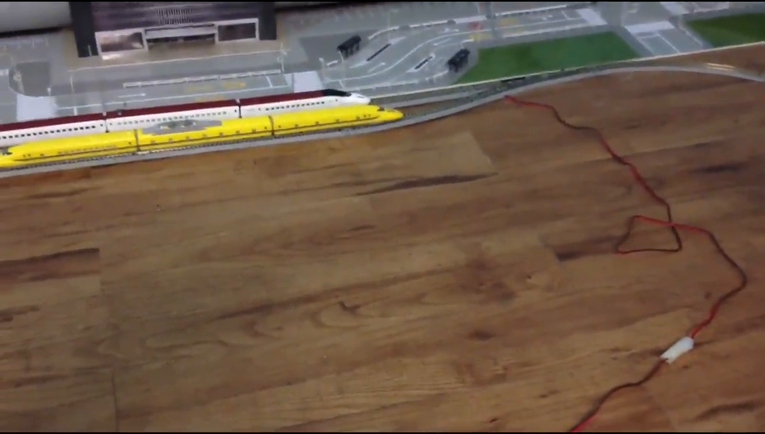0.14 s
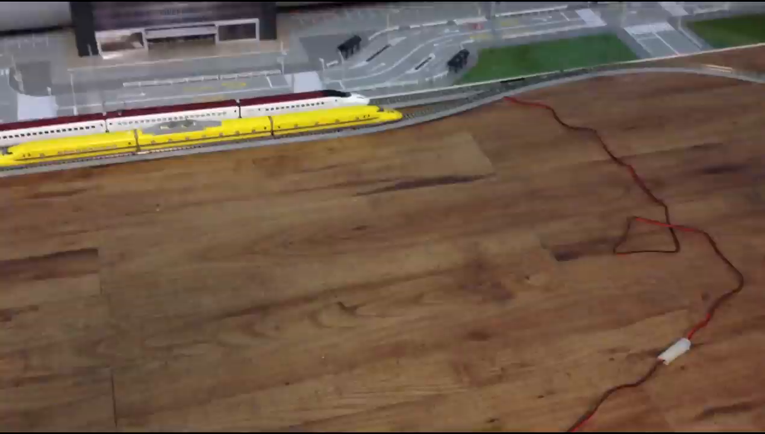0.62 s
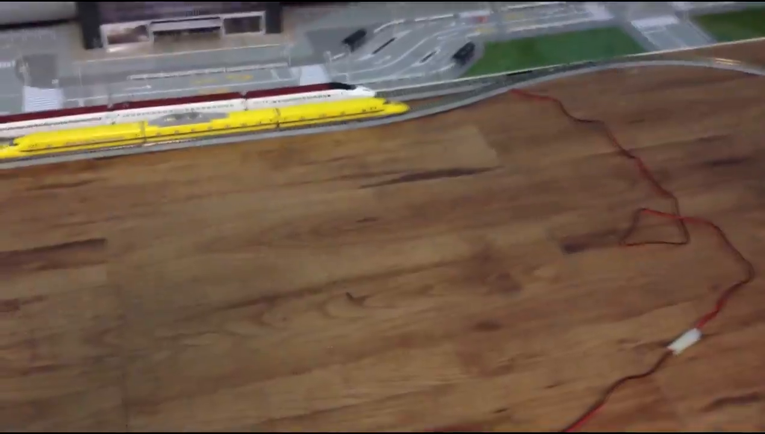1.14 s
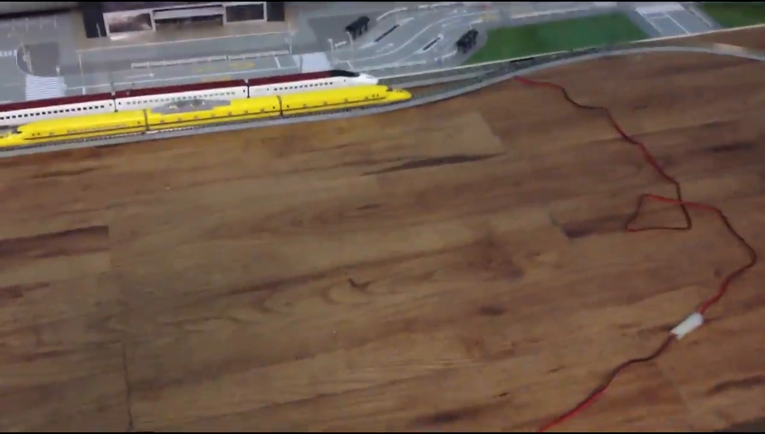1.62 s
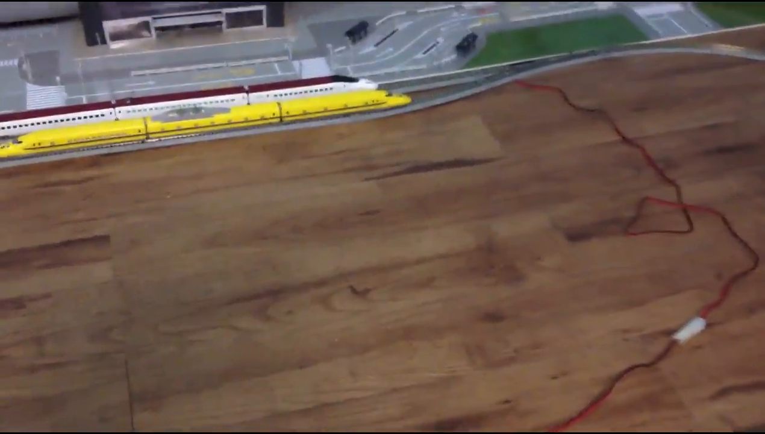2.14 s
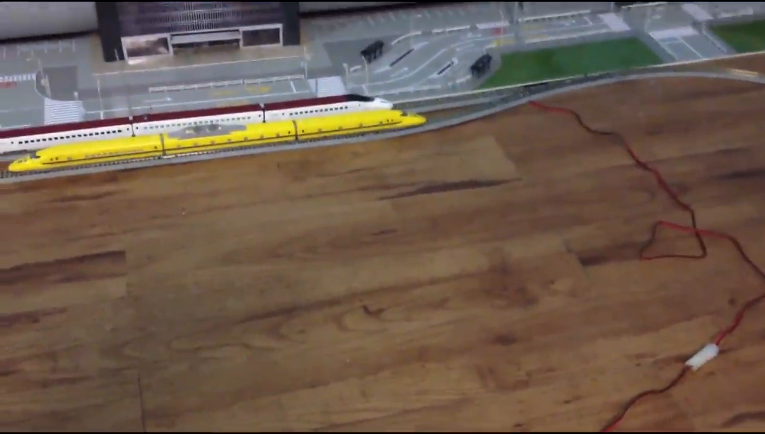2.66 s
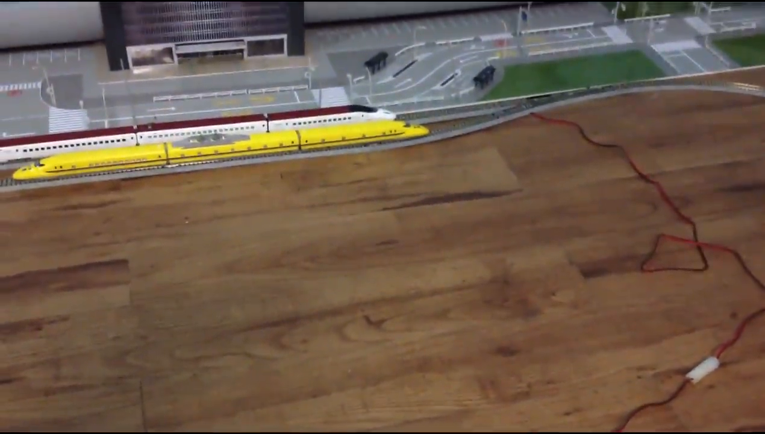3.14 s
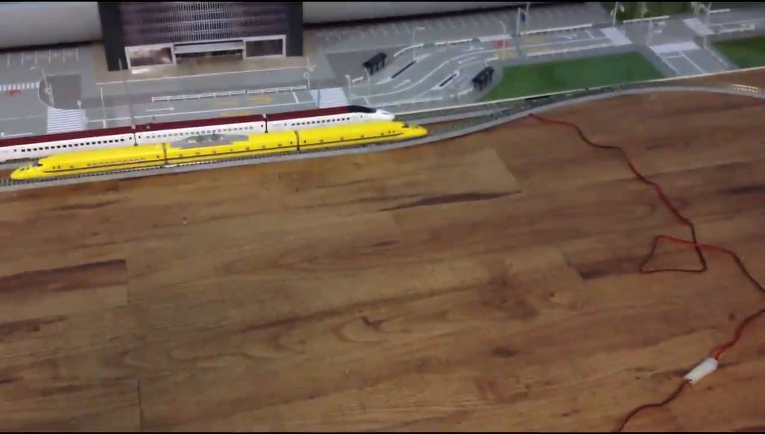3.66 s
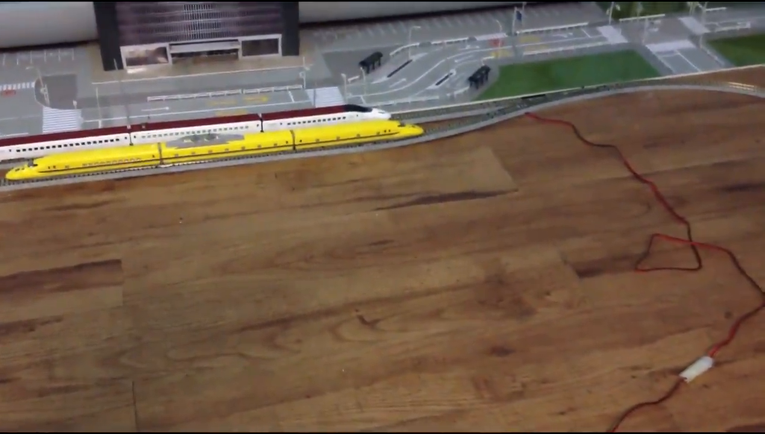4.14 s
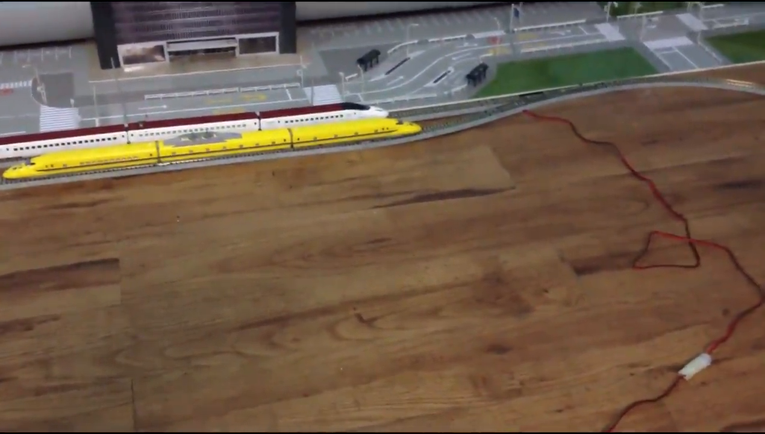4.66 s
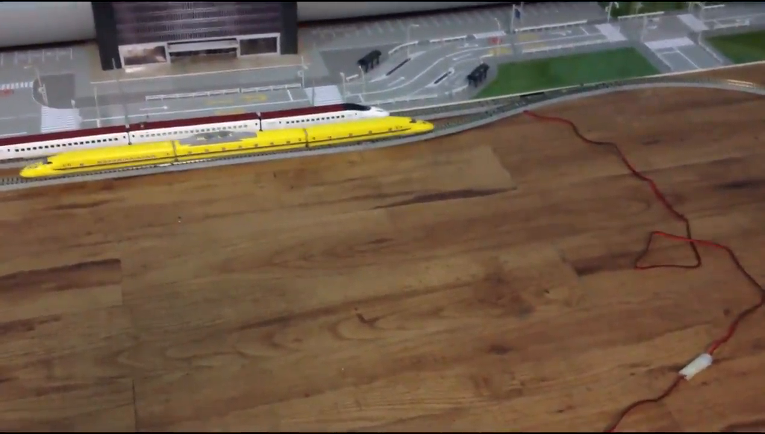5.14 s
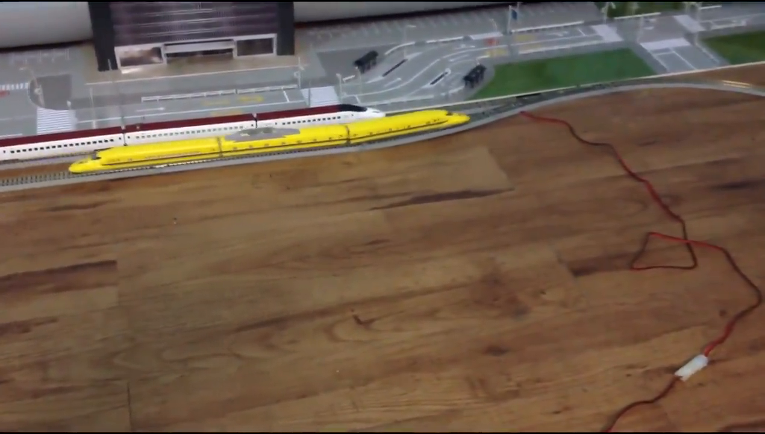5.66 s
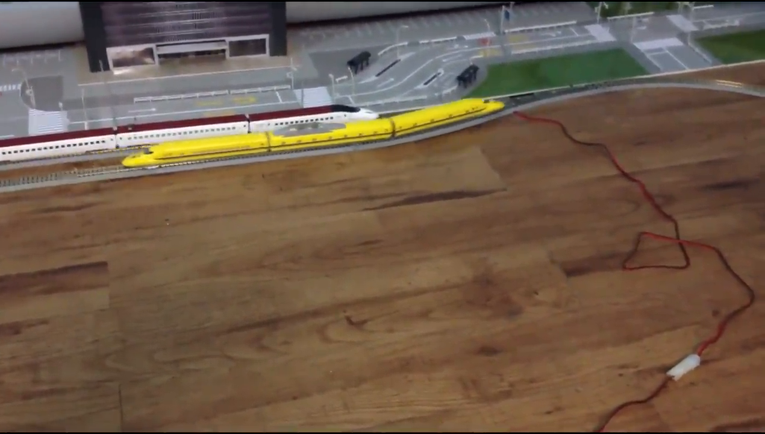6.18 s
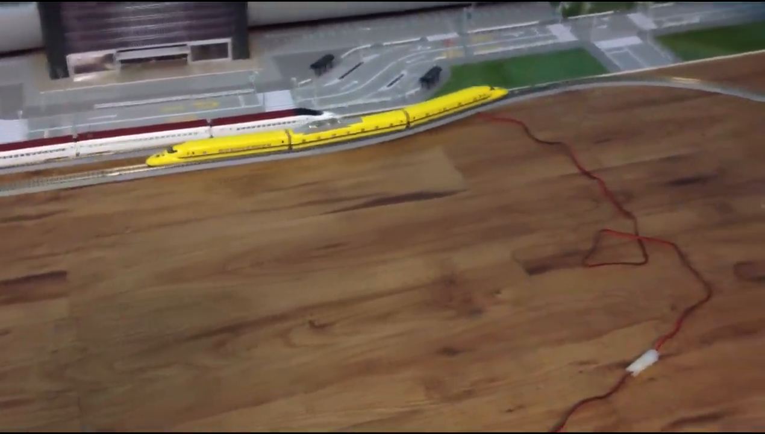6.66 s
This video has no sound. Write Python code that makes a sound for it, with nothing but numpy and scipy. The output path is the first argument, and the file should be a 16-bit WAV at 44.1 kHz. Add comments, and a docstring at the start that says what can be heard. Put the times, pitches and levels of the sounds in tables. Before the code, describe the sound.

High buzzy whir of toy train motors and wheels, one crisp loud clack near two seconds, later clicks, a tiny falling chirp and low rolling rumble.

```python
"""Model trains on a wooden floor

One small electric train runs round the loop: noise at its wheels is shaped by shell, gear, wheel and rail
resonances whose balance shifts as it turns. Wheels tick over rail joints and cars thump over loose track, as
decaying modes. A near train pulls away with a growing roll and hiss, and a flange squeaks as a falling tone.
Motors and supply hum as wavering sines; filtered noise makes the floor rumble. One microphone takes it all.
"""
import sys
import numpy as np
from scipy import signal
from scipy.fft import rfft, irfft, next_fast_len
from scipy.io import wavfile
from scipy.ndimage import uniform_filter1d, map_coordinates

SR = 44100
rng = np.random.default_rng(int(sys.argv[2]) if len(sys.argv) > 2 else 0)


def wav_out(sig):
    """Save sig, one row per channel (or a flat mono array), as 16-bit PCM at SR to the path in sys.argv[1]."""
    wavfile.write(sys.argv[1], SR, np.round(np.clip(np.atleast_2d(sig).T, -1, 1) * 32767).astype(np.int16))


def decibels_to_gain(level_db):
    """Convert a level in decibels to a linear amplitude gain (20 dB per decade)."""
    exponent = np.asarray(level_db, float) / 20
    return 10 ** exponent


N = 299439

# Running train's nearness to the microphone: time_s, shell_level_db
NEARNESS = [(0, -31.5), (1, -28.5), (2.5, -27), (3.5, -27.8), (4.5, -28.5), (5, -30.5), (5.5, -30.5),
            (6, -32.5), (6.79, -36.5)]
# Resonances of car shell, gear train and rail contact: centre_hz, width_hz (before body() widens it),
# level_db (relative within each part)
SHELL = [(970, 370, -18.5), (1400, 490, -6), (1860, 660, -4), (2214, 570, -1), (2770, 1530, -4),
         (5100, 530, -8)]
GEARS = [(3750, 600, -1), (4103, 490, 0.5), (4560, 1040, -3.5)]
RAIL = [(11720, 4600, 11), (14600, 3000, -5)]
# Gears, wheels, rail contact, one row each: level_db (over shell), swing_db, faces_microphone_s
FACING = [(-2, 2, 1.36), (-0.1, 1, 4.43), (-5.5, 2, 5.56)]
# Wheels at rail joints: time_s, peak_db, brightness_db_per_octave
TICKS = [(2.219, -10, 9), (5.385, -14, -2), (5.399, -26, -1), (5.91, -32, 0), (5.949, -15, 0),
         (5.96, -19, 1)]
# Modes of the wheel set: pitch_hz, level_db (relative), t60_s
WHEEL_MODES = [(1370, -6, .03), (2110, -2, 0.031), (2800, -1, 0.023), (3840, 4, .03), (7460, -8, .015)]
# Cars over loose track: time_s, peak_db, brightness_db_per_octave
THUMPS = [(.909, -28, -10), (1.252, -30, 9), (1.279, -31, -7), (1.992, -34, -8), (2.609, -34, -10),
          (2.799, -34, 13), (3.995, -33.5, 4), (6.094, -36, 12), (6.529, -34, 11), (6.58, -30, 5),
          (6.639, -29.5, -3), (6.7, -36, -1)]
# Modes of a floor plank: pitch_hz, level_db (relative), t60_s
PLANK_MODES = [(181, -7.5, 0.11), (207, -9, 0.13), (219, -4, .1), (305, -3, 0.078), (338, -5, 0.088)]
# Spectrum of the track bed under the near train: frequency_hz, density_db (relative, per Hz)
TRACK_BED = [(110, -38), (180, -30), (216, 4.5), (253, -1), (345, -2.5), (383, -3.5), (424, -2.5),
             (493, -6), (716, -1), (840, -1), (1020, -3.5), (1080, -15), (1200, -2), (1560, -22),
             (2640, -120)]
# Spectrum of the near train's wheels: frequency_hz, density_db (relative, per Hz)
NEAR_HISS = [(900, -44), (1300, -6), (3200, 2.5), (4300, -6), (6000, -7), (9800, -2), (15000, -17)]
# Motor hums: start_s, length_s, pitch_hz, level_db
HUMS = [(0, .95, 370.6, -54), (1.2, 1.46, 419.7, -55), (3.35, 0.69, 354.7, -54), (4.9, 1.95, 422.4, -52.5),
        (4.9, 1.95, 349, -51)]
# Spectrum of the floor boards: frequency_hz, density_db (relative, per Hz)
BOARDS = [(25, -24), (60, -49), (95, -40), (115, -2), (140, -3), (171, 2.5), (212, 1), (255, -4), (350, -2),
          (390, -6), (420, -7.5), (460, -11), (560, -22), (700, -36), (910, -52), (1540, -120)]
# Cancellation by the echo off the floor: centre_hz, width_hz, gain_db
FLOOR_ECHO_DIPS = [(543, 78, -2.5), (3080, 300, -1), (5920, 670, -2), (9830, 1100, -2.5)]


def unit(x):
    """Scaled to rms 1."""
    return x / np.sqrt(np.mean(np.abs(x) ** 2) + 1e-20)


def along(points, hz):
    """(frequency_hz, value) points read on a log frequency axis."""
    f, v = np.transpose(points)
    return np.interp(np.log(hz + 1), np.log(f + 1), v)


def shell_level_db(t):
    """The running train's nearness read at times t."""
    times, level = np.transpose(NEARNESS)
    return np.interp(t, times, level)


def wobble(rate):
    """A smooth random curve with this many knots a second."""
    knots = rng.standard_normal(int(N * rate / SR) + 4)
    return map_coordinates(knots, [np.arange(N) * rate / SR])


def coloured(spectrum):
    """Noise of rms 1 with a (frequency_hz, density_db) spectrum."""
    m = next_fast_len(N)
    gain = decibels_to_gain(along(spectrum, np.fft.rfftfreq(m, 1 / SR)))
    return unit(irfft(rfft(rng.standard_normal(m)) * gain, m)[:N])


def tone(hz, level, waver_hz, waver_db, rate):
    """A sine whose pitch and level waver at random."""
    pitch = hz + waver_hz * wobble(12) + waver_hz * wobble(2.5)
    phase = 2 * np.pi * np.cumsum(pitch) / SR
    return np.sqrt(2) * level * decibels_to_gain(waver_db * wobble(rate)) * np.sin(phase)


def ring(hz, centre_hz, width_hz):
    """Power response of a resonance applied twice."""
    return (1 + (2 * (hz - centre_hz) / width_hz) ** 2) ** -2.


def share(power):
    """A power spectrum scaled to sum 1 over frequency."""
    return power / power.sum(axis=0)


def body(hz, modes):
    """Power spectrum of several resonances, each widened a little, summing to 1."""
    return share(sum(decibels_to_gain(2 * db) * ring(hz, centre, 1.096 * width) for centre, width, db in modes))


def patches(shape, hz_bins, frames):
    """A random field of rms 1, smoothed over so many bins and frames."""
    across_hz = uniform_filter1d(rng.standard_normal(shape), hz_bins, axis=0)
    return unit(uniform_filter1d(across_hz, frames, axis=1))


def rail_contact():
    """Rail roughness as unsteady noise; axles clip far rail joints and each clip dies away."""
    clips_per_s, decay_s = 20, 0.0068
    clips = (rng.random(N) < clips_per_s / SR) * rng.uniform(0, .3, N)
    clatter = 1 + signal.lfilter([1], [1, -np.exp(-1 / (decay_s * SR))], clips)
    unsteady = decibels_to_gain(0.13 * wobble(7) + 0.14 * wobble(90))
    return unit(clatter * unsteady * rng.standard_normal(N))


def running_train():
    """Rail roughness shakes wheels, gears and shell; the part facing the microphone changes round the loop."""
    frame = 1024
    turn_s = 5.97  # once round the loop
    hz, t, contact = signal.stft(rail_contact(), SR, nperseg=frame)
    hz = hz[:, None]
    gear_db, wheel_db, rail_db = [
        level_db + swing_db * np.cos(2 * np.pi * (t - faces_s) / turn_s)
        for level_db, swing_db, faces_s in FACING]
    wheel_hz = 6890 + 136 * t  # the wheel ring climbs steadily, in Hz per second
    power = body(hz, SHELL)
    power = power + decibels_to_gain(2 * gear_db) * body(hz, GEARS)
    power = power + decibels_to_gain(2 * rail_db) * body(hz, RAIL)
    power = power + decibels_to_gain(2 * wheel_db) * share(ring(hz, wheel_hz, width_hz=3480))
    # echoes off floor and walls: drifting random gain in broad patches and narrow ridges
    broad_db = 0.61 * patches(contact.shape, hz_bins=16, frames=9)
    narrow_db = 1.14 * patches(contact.shape, hz_bins=2, frames=6)
    gain = decibels_to_gain(shell_level_db(t) + broad_db + narrow_db) * np.sqrt(power * len(hz))
    return signal.istft(contact * gain, SR, nperseg=frame)[1][:N]


def joints(events, modes, attack_s, length_s, crack):
    """Each blow rings the same modes at new strengths; harder contact favours the high ones."""
    out = np.zeros(N + SR)
    t = np.arange(round(length_s * SR)) / SR
    hz, level_db, t60_s = np.transpose(modes)[:, :, None]
    chances = rng.standard_normal((len(events), len(modes), 1))
    for (time_s, peak_db, bright), chance in zip(events, chances):
        strength = decibels_to_gain(level_db + bright * np.log2(hz / hz.mean()) + 4.2 * chance)
        ringing = strength * decibels_to_gain(-60 * t / t60_s) * np.sin(2 * np.pi * hz * t)
        blow = ringing.sum(axis=0) * (1 - np.exp(-t / attack_s))
        # the edge bites first: a short burst of bright noise
        bite = np.diff(rng.standard_normal(len(t) + 1))
        blow += crack * decibels_to_gain(-60 * t / (12 * attack_s)) * bite
        out[round(time_s * SR):][:len(t)] += decibels_to_gain(peak_db) * blow / np.abs(blow).max()
    return out[:N]


def near_track():
    """The near track bed rolls under the weight of the cars and wheels hiss along it."""
    pass_s, pass_width_s, pass_db = 1.1, 1, -50.5  # the running train crosses
    start_s, roll_db, roll_power = 4.63, -42.5, .25  # near train starts; bed level 1 s later; growth
    t = np.arange(N) / SR
    crossing = decibels_to_gain(pass_db) * np.exp(-((t - pass_s) / pass_width_s) ** 2 / 2)
    pulling_away = decibels_to_gain(roll_db) * np.maximum(t - start_s, 0) ** roll_power
    bed = decibels_to_gain(0.54 * wobble(7)) * coloured(TRACK_BED)
    hiss = decibels_to_gain(4.5 + .8 * wobble(30)) * coloured(NEAR_HISS)
    return (crossing + pulling_away) * (bed + hiss)


def squeak():
    """A flange catches the rail: a falling, broken chirp."""
    loudest_s, pitch_hz, level_db = 5.94, 1265, -44.5
    fall_hz_per_s, rise_s, fade_s = 800, 0.034, 0.085
    since = np.arange(N) / SR - loudest_s
    swell = np.exp(-(since / np.where(since < 0, rise_s, fade_s)) ** 2)
    hz = pitch_hz - fall_hz_per_s * np.clip(since, -.3, .3)
    return tone(hz, decibels_to_gain(level_db) * swell, waver_hz=9, waver_db=4, rate=45)


def motors():
    """Motor hums that come and go, and the buzz of the power supply, as wavering sines."""
    fade_s = 0.13
    t = np.arange(N) / SR
    out = tone(121.4, decibels_to_gain(-59), waver_hz=3.015, waver_db=2.5, rate=6.0)  # power supply
    for start_s, length_s, pitch_hz, level_db in HUMS:
        inside_s = np.minimum(t - start_s, start_s + length_s - t)
        gate = np.clip(inside_s / fade_s + .5, 0, 1)
        out += tone(pitch_hz, decibels_to_gain(level_db) * gate, waver_hz=1.3, waver_db=2.3, rate=6.6)
    return out


def floor_rumble():
    """The boards carry the weight of the cars: low noise that partly follows the running train's nearness."""
    rumble_db, follows = -45, 0.3  # level at mean nearness; dB per dB of nearness
    load_s, load_rise_db_per_s = 6.32, 12  # near train's weight reaches the loose boards
    t = np.arange(N) / SR
    shell_db = shell_level_db(t)
    level_db = rumble_db + follows * (shell_db - shell_db.mean())
    level_db += load_rise_db_per_s * np.maximum(t - load_s, 0)
    return decibels_to_gain(level_db + 0.73 * wobble(7.4)) * coloured(BOARDS)


def scene():
    """Everything reaches one microphone, copied to both channels."""
    mono = running_train()
    mono = mono + joints(TICKS, WHEEL_MODES, attack_s=0.00082, length_s=.15, crack=1.2)
    mono = mono + joints(THUMPS, PLANK_MODES, attack_s=0.01, length_s=.4, crack=0)
    mono = mono + near_track() + squeak() + motors() + floor_rumble()
    return np.array([mono, mono])


def roll_off(x):
    """The treble ends steeply here."""
    return signal.sosfilt(signal.butter(12, 16330, fs=SR, output="sos"), x)


def record(dry):
    """The microphone cuts the deep bass and hears the floor echo; a sharp lowpass ends the treble at top_hz."""
    top_hz, bass_hz = 15330, 110
    m = next_fast_len(N + SR // 2)
    hz = np.fft.rfftfreq(m, 1 / SR)
    response = (hz < top_hz) / np.sqrt(1 + (bass_hz / (hz + 1)) ** 4)
    response *= decibels_to_gain(sum(db * ring(hz, centre, width) for centre, width, db in FLOOR_ECHO_DIPS))
    mix = irfft(rfft(dry, m) * response, m)[:, :N]
    return roll_off(mix)


dry = scene()
out = record(dry)
wav_out(out)
```